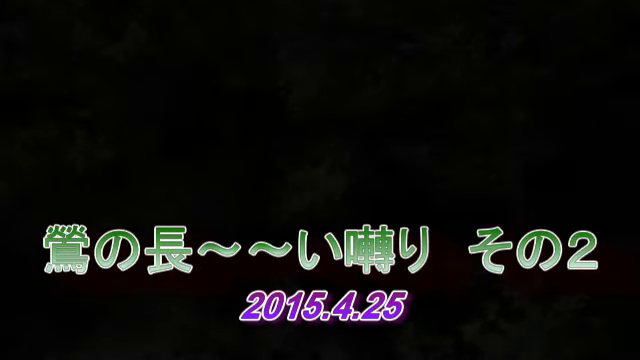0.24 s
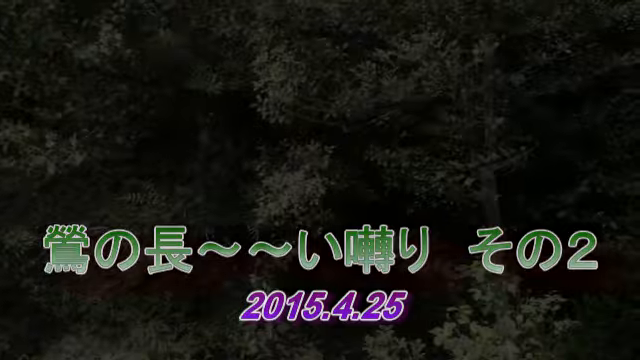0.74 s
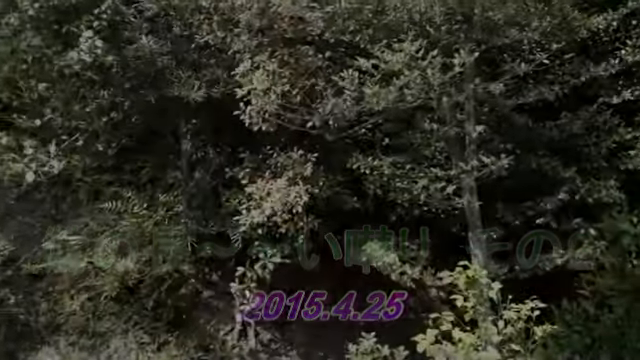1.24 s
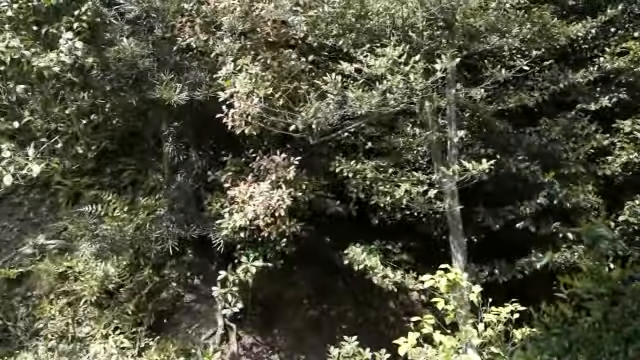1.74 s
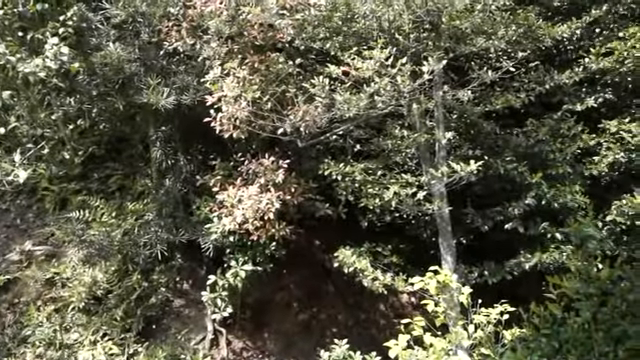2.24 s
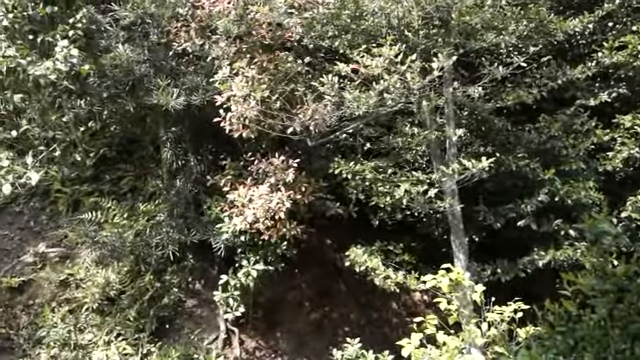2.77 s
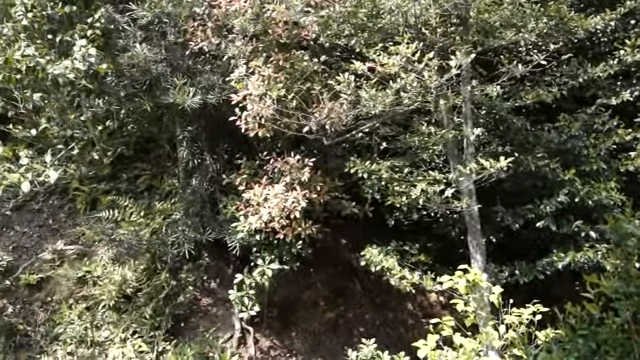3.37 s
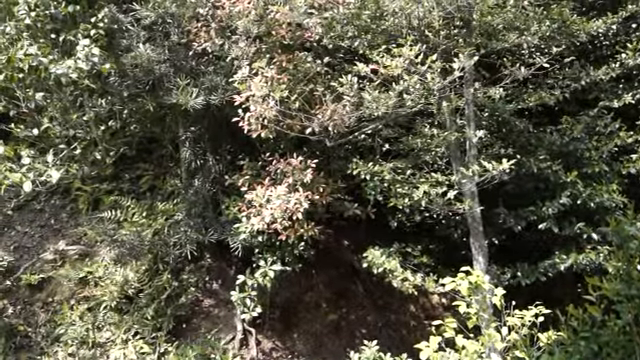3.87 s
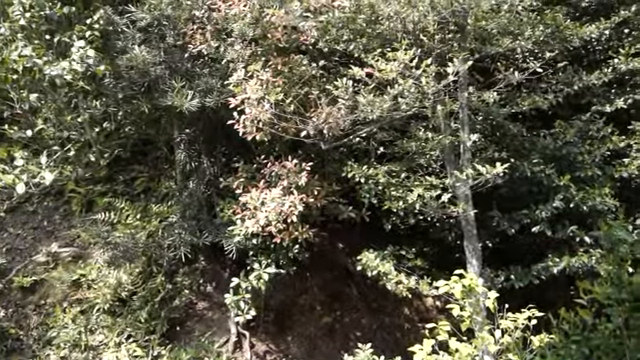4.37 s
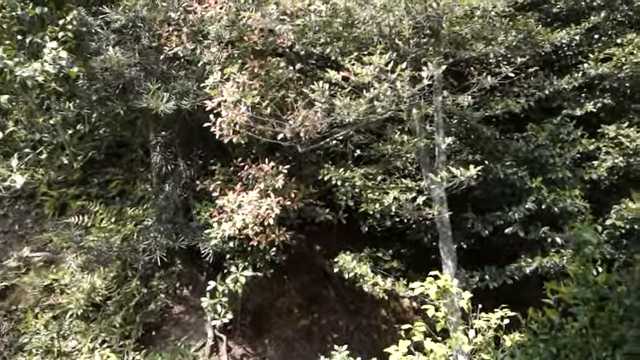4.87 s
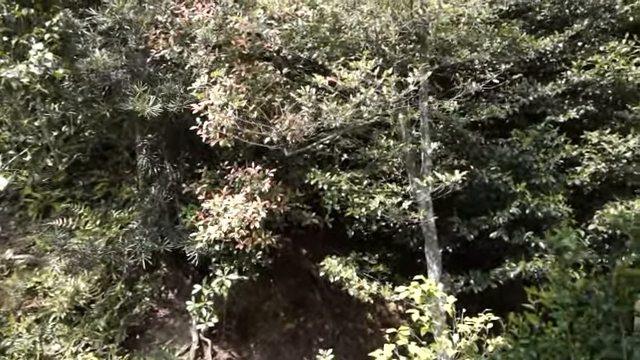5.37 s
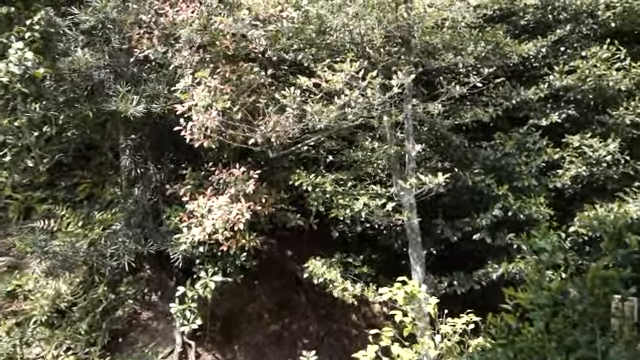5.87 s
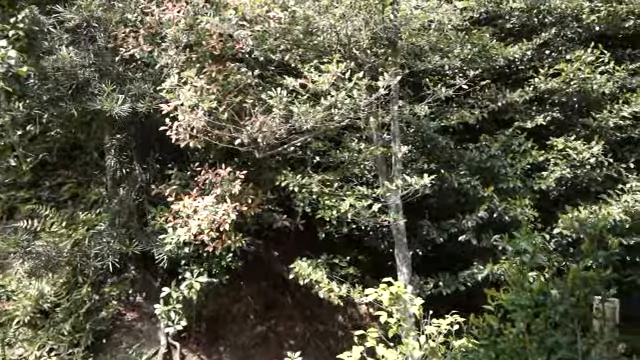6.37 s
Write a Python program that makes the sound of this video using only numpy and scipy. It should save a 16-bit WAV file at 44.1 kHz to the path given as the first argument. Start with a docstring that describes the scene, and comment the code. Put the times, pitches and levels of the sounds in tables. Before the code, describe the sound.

A songbird nearby sings a rising-in-volume whistle, three sharp sweeps and a long run of quick notes, with faint birds and rumble behind.

```python
"""A bush warbler in shrubs close to the microphone, with distant rumble and airy hiss behind it.
Small birds chirp far off as the air comes up. The warbler swells a held whistle, flings out three swept
notes at 2 s and, from 3 s to the end, runs through short arched notes: pure tones with overtones shaped
by its throat, which leaves and trunks scatter into a short tail. Doves start to coo just before the run;
during it something hoots faintly in the distance, and near the end an insect buzzes."""
import sys
import numpy as np
from scipy import signal
from scipy.io import wavfile
from scipy.ndimage import uniform_filter1d

SR = 44100
rng = np.random.default_rng(int(sys.argv[2]) if len(sys.argv) > 2 else 0)


def store_wav(level_fs):
    """Save 16-bit WAV to argv[1]."""
    pcm = np.round(np.clip(np.atleast_2d(level_fs), -1, 1) * 32767)
    wavfile.write(sys.argv[1], SR, pcm.T.astype(np.int16))


N = 291501

# partials 2-6 of the warbler's open notes, before the throat (relative level [dB])
OPEN_OVERTONES = [-27, -38.5, -46, -35.5, -37.5]
# how strongly the song's treble comes through (time [s], gain [dB])
SONG_TREBLE = [(2.2, 0), (3.1, 3.5), (4.2, -1), (4.6, -3.5), (5.7, -5.5), (6.2, 1)]
# course of the distant rumble (time [s], deep level [dB], upper level [dB])
RUMBLE_LEVELS = [(0, -68, -72), (.5, -62.5, -64), (1.2, -58.5, -56), (1.6, -50.5, -55), (1.9, -51.5, -50),
                 (2.5, -52, -58), (2.9, -59, -61.5), (3.4, -60, -56), (4.1, -64, -56), (4.4, -56.5, -53.5),
                 (4.85, -55, -52), (5.4, -54, -52), (5.9, -54.5, -46.5), (6.3, -54, -50.5),
                 (6.61, -62.5, -50)]


def warbler_whistle():
    """The held whistle: after a faint first try, the pitch eases up to its top as the level swells."""
    swell = [(.64, -79), (.75, -55), (.79, -80), (.88, -72), (.98, -47), (1.18, -39.5), (1.36, -38),
             (1.6, -35.5), (1.90, -31), (1.942, -26.5), (1.955, -43)]  # (time [s], level [dB])
    # partials 2-6 at the loudest point, before the throat (relative level [dB])
    overtones = [-18, -39, -59.5, -53, -37]
    low_hz, top_hz, climb_from_s, climb_s = 1183, 1286, .85, .36
    times, levels = np.transpose(swell)
    t = np.arange(times[0], times[-1], 1 / SR)
    hz = top_hz - (top_hz - low_hz) * np.exp(-np.maximum(t - climb_from_s, 0) / climb_s)
    db = np.interp(t, times, levels)
    waver_db = .5 * drift(36)[:len(t)]
    dip_db = -9 * np.exp(-((t - 1.657) / .018) ** 2)
    fundamental = from_db(waver_db + dip_db)
    upper = [from_db(overtone + .8 * (db - db.max())) for overtone in overtones]  # grow with loudness
    release = np.clip((times[-1] - t) / .003, 0, 1)
    out = np.zeros(N)
    add_tone(out, times[0], hz, release * from_db(db), [fundamental, *upper])
    return out


def warbler_sweeps():
    """Three loud notes that swing widely in pitch."""
    notes = [
        [(2.006, 1310, -32), (2.013, 1300, -27), (2.024, 1302, -19.5), (2.040, 1865, -18.5),
         (2.053, 2650, -12.5), (2.064, 1995, -19.5), (2.074, 1680, -20), (2.110, 1484, -23), (2.122, 1560, -50)],
        [(2.151, 4590, -39), (2.157, 4400, -26), (2.163, 3230, -19.5), (2.171, 2824, -9), (2.181, 3320, -25),
         (2.194, 4340, -16), (2.209, 2767, -12), (2.221, 1716, -16), (2.235, 1250, -23.5), (2.246, 1090, -43)],
        [(2.303, 5320, -53.5), (2.309, 5030, -23), (2.319, 3380, -14.5), (2.329, 2610, -9.5),
         (2.344, 2106, -15), (2.358, 2363, -9), (2.373, 3323, -17.5), (2.388, 4320, -25.5),
         (2.398, 4750, -23.5), (2.412, 5030, -45)],
    ]  # one curve a note (time [s], pitch [Hz], level [dB])
    return glides(notes, OPEN_OVERTONES, smooth_s=.0044, effort=.21)


def warbler_run():
    """The fast run: four kinds of note, each led in by a pressed grace note."""
    # notes (time [s], length [s], turning pitch [Hz], end pitch [Hz], loudest at [share of length],
    #        level [dB], grace length [s], grace end pitch [Hz], relative grace level [dB])
    leaps = [ (3.135, 0.038, 3830, 2480, 0.4, -20, 0.02, 1896, -35.5),
             (3.221, 0.027, 3025, 2450, 0.81, -15.5, 0.016, 2393, -33),
             (4.066, .035, 3323, 2560, 0.84, -14, .008, 2380, -45.5),
             (5.372, .044, 3443, 2410, 0.83, -17, 0.012, 2087, -45),
             (6.170, .042, 3425, 2466, .62, -14.5, .013, 2400, -41.5), ]  # wide jump up, then over
    arches = [ (3.311, 0.026, 2666, 2470, 0.65, -14.5, 0.021, 1873, -27.5),
              (3.418, 0.02, 2610, 2490, 0.49, -15, 0.025, 1744, -25.5),
              (3.532, 0.022, 2606, 2340, 0.29, -16.5, 0.026, 1810, -28.5),
              (3.644, 0.017, 2590, 2385, 0.59, -14.5, 0.029, 1737, -27.5),
              (3.848, 0.028, 2651, 2360, 0.69, -10.5, 0.029, 1700, -28),
              (4.305, 0.03, 2723, 2360, .39, -16.5, 0.027, 1805, -27),
              (4.557, .040, 2584, 2303, 0.4, -12, 0.031, 1673, -28),
              (4.816, 0.033, 2638, 2317, 0.9, -11.5, .024, 1770, -27),
              (5.125, 0.029, 2716, 2190, 0.61, -16, 0.027, 1715, -33.5),
              (5.684, 0.034, 2937, 2270, .7, -15, 0.014, 1815, -28),
              (5.941, 0.032, 2760, 2240, 0.62, -14, .024, 1705, -31.5),
              (6.593, 0.036, 2852, 2480, 0.86, -11.5, .013, 1915, -34.5)]  # shallow arch
    hooks = [ (3.740, 0.022, 2360, 1807, 0.25, -18, 0.024, 1816, -27),
             (4.445, 0.036, 2283, 1780, 0.074, -18.5, 0.015, 1890, -41.5),
             (4.710, 0.038, 2254, 1745, 0.12, -20, 0.0075, 2040, -38.5),
             (4.921, .034, 2420, 1916, 0.68, -14.5, 0.01, 1804, -32.5),
             (5.787, 0.037, 2330, 1814, 0.16, -16, 0.01, 1746, -31)]  # falls, lingers, falls again
    droops = [ (4.202, 0.045, 2580, 1770, 0.3, -19.5, 0.021, 1746, -29),
              (5.479, 0.034, 2620, 1860, 0.54, -14, .022, 1859, -26.5),
              (6.391, 0.038, 2663, 1703, .62, -20.5, .019, 1857, -31)]  # early top, long fall
    # shapes (start over turning pitch [ratio], turn at [share of length], swell [exponent],
    #         fade [exponent], octave at onset before the throat [dB])
    leap = (.54, .45, 1.3, 0.39, -2)
    arch = (.85, .39, 1.4, .7, -13)
    hook = (1.2339, 0.39, 0.6, 0.68, -17.5)
    droop = (.93, .26, .9, 1.7, -8)
    return (open_notes(leaps, *leap) + grace_notes(leaps, start_ratio=.68, overlap_s=.006)
            + open_notes(arches, *arch) + grace_notes(arches, start_ratio=.7, overlap_s=.003)
            + open_notes(hooks, *hook) + grace_notes(hooks, start_ratio=.7, overlap_s=.003)
            + open_notes(droops, *droop) + grace_notes(droops, start_ratio=.7, overlap_s=.009))


def open_notes(notes, start_ratio, turn, rise, fall, octave_db):
    """Pitch curves into a turn and bends away; the octave is strong until the throat has opened."""
    opening_s, closing_s = .005, .005
    out = np.zeros(N)
    for start, length, turn_hz, end_hz, loudest, level_db, *_ in notes:
        u = np.linspace(0, 1, round((length + closing_s) * SR))
        before = np.clip(1 - u / turn, 0, 1)
        after = np.clip((u - turn) / (1 - turn), 0, 1)
        hz = turn_hz * (1 + (start_ratio - 1) * before ** 2) + (end_hz - turn_hz) * after ** 2
        swell = np.sin(np.pi / 2 * np.clip(u / loudest, 0, 1)) ** rise
        fade = np.abs(np.cos(np.pi / 2 * np.clip((u - loudest) / (1 - loudest), 0, 1))) ** fall
        effort = swell * fade
        close = np.sin(np.pi / 2 * np.clip((1 - u) * length / closing_s, 0, 1)) ** 2
        treble_db = np.interp(start, *np.transpose(SONG_TREBLE))
        partials = [1, *[from_db(db + treble_db) * effort for db in OPEN_OVERTONES]]
        partials[1] += from_db(octave_db) * np.exp(-u * length / opening_s)
        add_tone(out, start, hz, from_db(level_db) * effort * close, partials)
    return out


def grace_notes(notes, start_ratio, overlap_s):
    """Pressed, rasping upward slides, each running on into its main note."""
    partials = [-26.5, 6, -7.5, -29]  # partials 1-4, before the throat (relative level [dB])
    graces = [(start + overlap_s - length, length, start_ratio * hz, hz, db)
              for start, *_, length, hz, db in notes]
    return slides(graces, bend=1.5, late=1.4, shake=.45, waver=.032, flutter_hz=300, partials_db=partials)


def note_hiss(warbler, t):
    """A faint treble hiss that swells and dies with every loud note."""
    spectrum = [(5000, 5), (7000, -3.5), (10000, -8.5), (13000, 5), (16000, -13.5)]  # (frequency [Hz], relative density [dB])
    power = uniform_filter1d(np.mean(warbler ** 2, axis=0), int(.03 * SR))
    gain = from_db(-45.5 + np.interp(t, *np.transpose(SONG_TREBLE)))
    return gain * np.sqrt(np.abs(power)) * banded_noise(spectrum, flicker_db=-2)


def shrubs(sound, t60_s, second_t60_s, second_db, band_hz, likeness):
    """Leaves and trunks scatter dense random echoes with two summed decays; long waves pass by."""
    t = np.arange(int(.9 * SR)) / SR
    decay = from_db(-60 * t / t60_s) + from_db(second_db - 60 * t / second_t60_s)
    onset = np.clip(t / .0067, 0, 1)
    band = signal.butter(1, band_hz, "band", fs=SR, output="sos")
    mid, side = signal.sosfilt(band, rng.standard_normal((2, len(t)))) * decay * onset
    echoes = stereo(mid, side, likeness)
    echoes /= np.sqrt(np.sum(echoes ** 2) / 2)
    return signal.fftconvolve(sound[None], echoes, axes=1)[:, :N]


def far_birds():
    """Small birds chirp so far off that more scatter than direct sound reaches the microphone."""
    # (time [s], length [s], start pitch [Hz], end pitch [Hz], relative level [dB])
    notes = [ (.02, 0.032, 3860, 3370, -62), (.155, 0.063, 5320, 4350, -64), (.22, 0.12, 4440, 4460, -64),
             (.435, 0.065, 5070, 3550, -59.5), (.41, 0.031, 7370, 6300, -70),
             (.53, 0.071, 3500, 2920, -61.5), (.685, 0.06, 7500, 6400, -67),
             (.755, .045, 5460, 4280, -55.5), (.78, 0.25, 4720, 4580, -67.5), (.81, 0.049, 4200, 3520, -61),
             (1.00, 0.051, 3900, 3640, -57.5), (1.085, 0.105, 4950, 3330, -55.5),
             (1.28, 0.05, 6690, 5800, -60), (1.31, 0.065, 5200, 4940, -67.5), (1.44, 0.11, 4580, 3745, -58),
             (1.43, 0.18, 3500, 3400, -66.5), (1.64, 0.059, 7250, 5360, -64),
             (1.68, 0.075, 5150, 4330, -64.5), (1.75, 0.078, 3990, 3060, -55),
             (1.95, 0.038, 4700, 5380, -59), (2.02, 0.086, 5260, 4470, -66),
             (2.79, 0.03, 5400, 5300, -68.5), (2.83, 0.048, 5400, 4290, -60.5),
             (.45, 0.1, 1587, 1610, -62.5), ]
    chirps = slides(notes, bend=1, late=1.1, shake=.4, waver=.01, flutter_hz=80)
    scatter = shrubs(chirps, t60_s=.31, second_t60_s=.26, second_db=-.5,
                     band_hz=(2000, 12100), likeness=.1)
    return from_db(-9) * chirps + from_db(-3.5) * scatter


def doves():
    """Each soft-edged coo scoops up to its pitch, holds and sags."""
    coos = [(2.694, 0.049, 438, 454, -54), (4.211, 0.32, 432, 455, -51), (5.0, 0.099, 474, 528, -54.5),
            (5.65, .09, 434, 447, -51), (6.365, 0.274, 410, 519, -49)]  # (time [s], length [s], start pitch [Hz], top pitch [Hz], level [dB])
    scoop_s, sag, edge_db = .034, .065, -11.5
    u = np.linspace(0, 1, 20)
    notes = []
    for start, length, start_hz, top_hz, level_db in coos:
        scoop_hz = (top_hz - start_hz) * np.clip(1 - u * length / scoop_s, 0, 1)
        hz = top_hz * (1 - sag * u ** 3) - scoop_hz
        db = level_db + edge_db * (2 * u - 1) ** 4
        notes.append(np.transpose([start + u * length, hz, db]))
    return glides(notes, [-35], smooth_s=.025, effort=0)


def far_hoots():
    """Faint, nearly level tones from a long way off."""
    hoots = [ (3.12, .25, 1180, 1150, -65), (4.99, .10, 830, 780, -62), (5.08, .10, 980, 1050, -63),
             (5.50, .75, 835, 830, -68), (5.66, .50, 1250, 1240, -69), ]  # (time [s], length [s], start pitch [Hz], end pitch [Hz], level [dB])
    return slides(hoots, bend=.92, late=.99, shake=.4, waver=.008, flutter_hz=30)


def insect():
    """A thin, high tone that fast flutter roughens into a buzz."""
    buzz = [(5.97, .30, 11200, 10300, -72)]  # (time [s], length [s], start pitch [Hz], end pitch [Hz], level [dB])
    return slides(buzz, bend=1, late=1.6, shake=.5, waver=.045, flutter_hz=900)


def distant_rumble(t):
    """Two layers of low noise, each swelling and sinking on its own course."""
    # spectra (frequency [Hz], relative density [dB])
    upper_spectrum = [(170, -3.5), (230, 6), (320, 3.5), (440, 2.5), (560, -16), (700, -22.5)]
    deep_spectrum = [(20, -22), (40, -14.5), (80, -7), (120, 2), (170, -6.5)]
    times, deep_db, upper_db = np.transpose(RUMBLE_LEVELS)
    upper = from_db(np.interp(t, times, upper_db)) * banded_noise(upper_spectrum, flicker_db=3)
    deep = from_db(np.interp(t, times, deep_db)) * banded_noise(deep_spectrum, flicker_db=2.5)
    return upper + deep


def air(t):
    """Broad open-air hiss that takes a small part in the rumble's swings."""
    spectrum = [(450, 2.5), (700, -0.5), (1000, -3.5), (1800, -5), (3300, -12.5), (4400, -12),
                (5400, -23.5), (9000, -21.5), (16000, -41)]  # (frequency [Hz], relative density [dB])
    times, _, rumble_db = np.transpose(RUMBLE_LEVELS)
    swing_db = np.interp(t, times, rumble_db) - rumble_db.mean()
    return from_db(-58.5 + .17 * swing_db) * banded_noise(spectrum, flicker_db=1.5)


def leaves(t):
    """A very faint, high rustle; the leaves stir once in a gust."""
    spectrum = [(6500, 5.5), (9000, 5), (11000, -3.5), (13000, -12.5), (16000, -7.5)]  # (frequency [Hz], relative density [dB])
    gust_db = 2 * np.exp(-((t - 1) / .45) ** 2)
    return from_db(-79.5 + gust_db) * banded_noise(spectrum, flicker_db=-2.5)


def glides(notes, overtones_db, smooth_s, effort):
    """Notes on rounded pitch curves; overtones gain an extra `effort` dB for each dB of level."""
    out = np.zeros(N)
    for curve in notes:
        times, pitches, levels = np.transpose(curve)
        t = np.arange(times[0], times[-1], 1 / SR)
        hz = uniform_filter1d(np.interp(t, times, pitches), int(smooth_s * SR), mode="nearest")
        edge = np.clip(np.minimum(t - times[0], times[-1] - t) / .003, 0, 1)
        db = np.interp(t, times, levels)
        upper = [from_db(overtone + effort * (db - db.max())) for overtone in overtones_db]
        add_tone(out, times[0], hz, edge * from_db(db), [1, *upper])
    return out


def slides(notes, bend, late, shake, waver, flutter_hz, partials_db=(0,)):
    """Sliding notes; level shakes and pitch wavers by random shares, and `late` > 1 delays the peak."""
    out = np.zeros(N)
    lowpass = signal.butter(2, flutter_hz, fs=SR, output="sos")
    flutter = unit_rms(signal.sosfilt(lowpass, rng.standard_normal((2, N))))
    for start, length, start_hz, end_hz, level_db in notes:
        u = np.linspace(0, 1, round(length * SR))
        louder, higher = flutter[:, np.minimum(round(start * SR) + np.arange(len(u)), N - 1)]
        hz = (end_hz + (start_hz - end_hz) * (1 - u) ** bend) * (1 + waver * higher)
        gain = from_db(level_db) * np.sin(np.pi * u ** late) * (1 + shake * louder)
        add_tone(out, start, hz, gain, from_db(partials_db))
    return out


def add_tone(out, start_s, hz, gain, partial_gains):
    """Add a tone of moving pitch; the throat colours each overtone by where it lands."""
    throat = [(2400, -0.5), (3300, -6.5), (4300, 4), (5200, -13), (6500, -13.5), (8000, -13), (10500, -10),
              (13000, -13.5), (16000, -17)]  # (frequency [Hz], gain [dB])
    phase = 2 * np.pi * np.cumsum(hz) / SR
    tone = partial_gains[0] * np.sin(phase)
    for k, strength in enumerate(partial_gains[1:], start=2):
        tone += strength * from_db(at_hz(throat, k * hz)) * np.sin(k * phase) * (k * hz < SR / 2)
    at = round(start_s * SR)
    out[at:at + len(hz)] += (np.sqrt(2) * gain * tone)[:N - at]


def banded_noise(spectrum, flicker_db):
    """Stereo noise of rms 1 in half-octave bands, each with its own level, flicker and width."""
    likeness = [(30, 1), (125, 0.97), (250, 1), (500, 0.52), (1500, 0.39), (6000, 0.64), (14000, 0.27)]  # (frequency [Hz], left-right correlation [0-1])
    out, edges = 0, 20 * 2 ** np.arange(0, 10.1, .5)
    white = rng.standard_normal((2, 2, N))
    for k, (low, high) in enumerate(zip(edges, edges[1:])):
        hz = np.sqrt(low * high)
        if spectrum[0][0] / 1.2 < hz < spectrum[-1][0] * 1.2:
            band = signal.butter(2, [low, high], "band", fs=SR, output="sos")
            mid, side = signal.sosfilt(band, white[k % 2])
            gain = from_db(at_hz(spectrum, hz) + flicker_db * drift(2))
            out = out + gain * stereo(mid, side, at_hz(likeness, hz))
    return unit_rms(out)


def drift(rate_hz):
    """Slow random wander of rms 1."""
    step = 40
    pole = np.exp(-2 * np.pi * rate_hz * step / SR)
    slow = signal.lfilter([1], [1, -2 * pole, pole * pole], rng.standard_normal(N // step + 2002))[2000:]
    return np.interp(np.arange(N) / step, np.arange(len(slow)), unit_rms(slow))


def stereo(mid, side, likeness):
    """Left and right from two noises, correlated by `likeness`."""
    return np.sqrt(1 + likeness) * mid + np.sqrt(1 - likeness) * side * [[1], [-1]]


def pan(sound, left_db):
    """Raise the left channel and lower the right by the same amount."""
    return sound * from_db([[left_db], [-left_db]])


def at_hz(points, hz):
    """Read a table on a log-frequency axis."""
    frequencies, values = np.transpose(points)
    return np.interp(np.log(hz), np.log(frequencies), values)


def from_db(db):
    """Decibels to gain."""
    return 10 ** (np.asarray(db) / 20)


def unit_rms(x):
    """Scale to rms 1."""
    return x / np.sqrt(np.mean(x ** 2) + 1e-20)


def scene():
    """The warbler close up and near the centre, other callers a little left or centre, noise behind."""
    t = np.arange(N) / SR
    song = warbler_whistle() + warbler_sweeps() + warbler_run()
    scatter = shrubs(song, t60_s=.1, second_t60_s=.61, second_db=-10.5,
                     band_hz=(2310, 12800), likeness=.45)
    warbler = pan(song, -.3) + from_db(-4.5) * scatter
    hiss = note_hiss(warbler, t)
    callers = pan(far_birds(), .8) + pan(doves(), 1.5) + far_hoots() + pan(insect(), 1.2)
    fade_in = from_db(-13.5 * np.clip(1 - t, 0, 1) ** 2)  # over the first second
    background = distant_rumble(t) + fade_in * (air(t) + pan(leaves(t), 1.2))
    return warbler + hiss + callers + background


def record(dry):
    """A steep low-pass cuts the highest treble."""
    stop_hz = 15900
    return signal.sosfilt(signal.cheby2(24, 70, stop_hz, fs=SR, output="sos"), dry)


dry = scene()
out = record(dry)
store_wav(out)
```